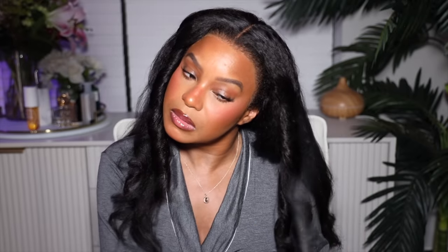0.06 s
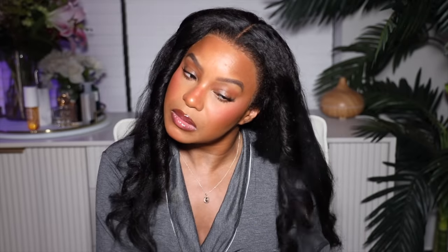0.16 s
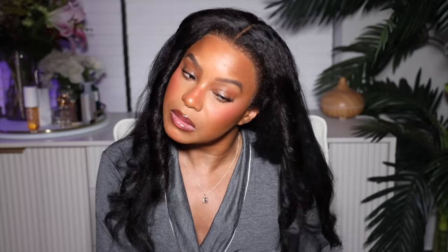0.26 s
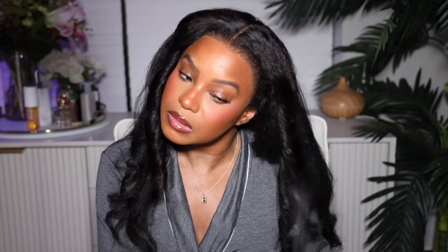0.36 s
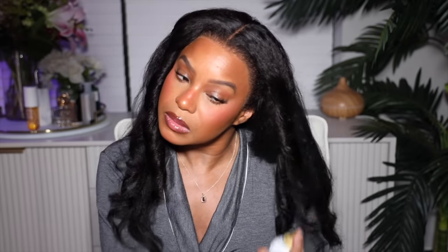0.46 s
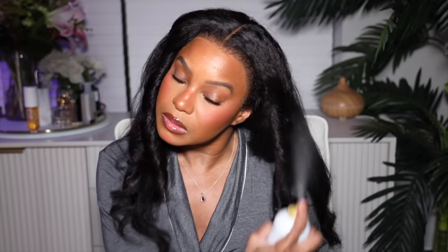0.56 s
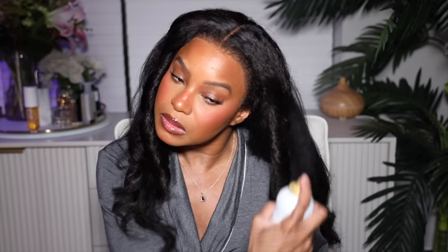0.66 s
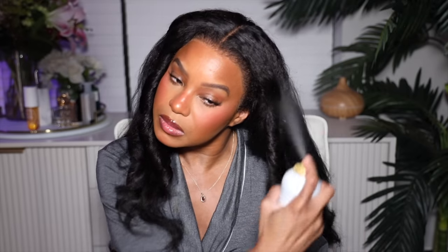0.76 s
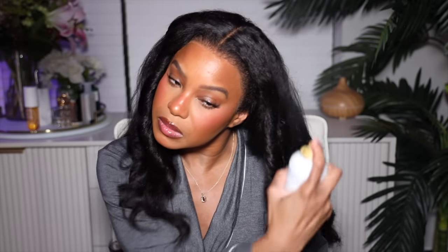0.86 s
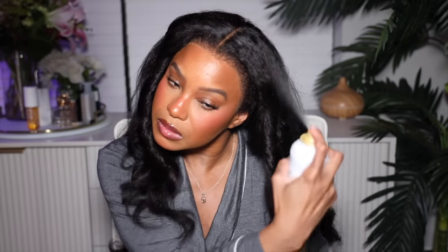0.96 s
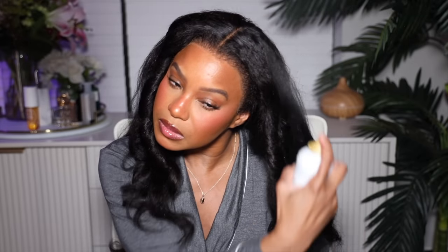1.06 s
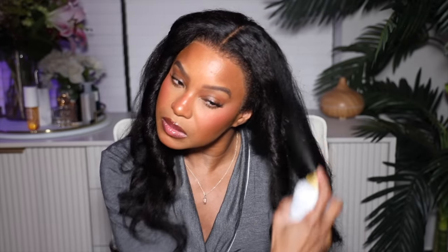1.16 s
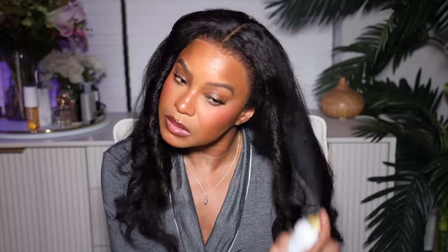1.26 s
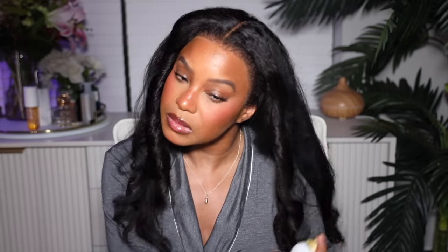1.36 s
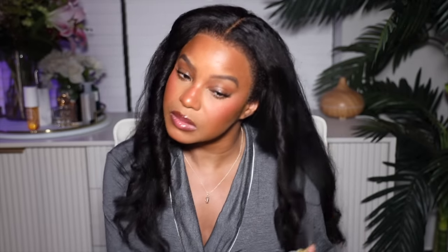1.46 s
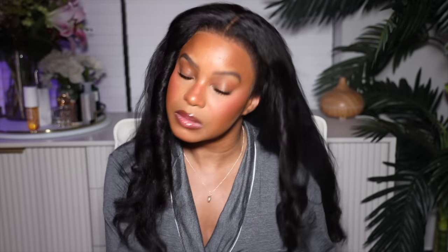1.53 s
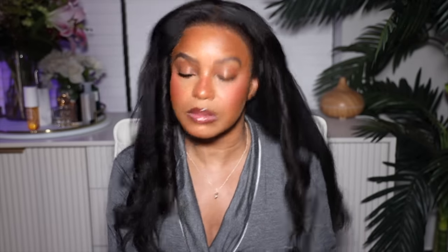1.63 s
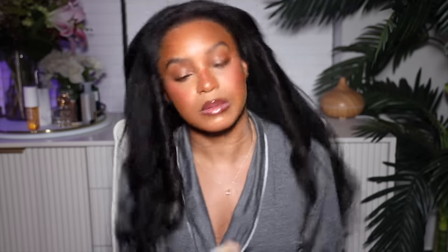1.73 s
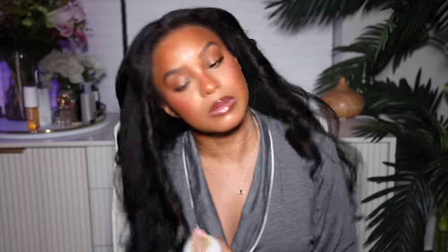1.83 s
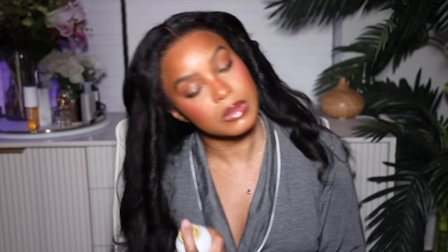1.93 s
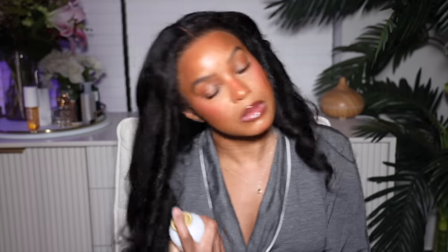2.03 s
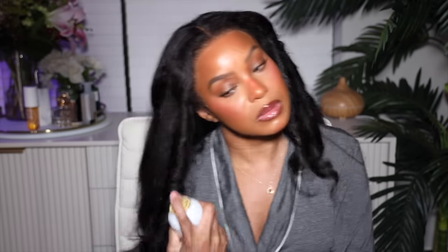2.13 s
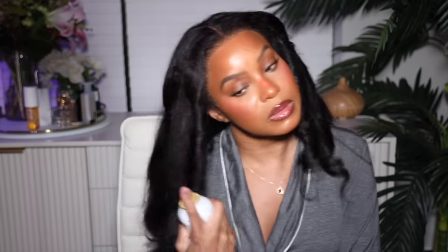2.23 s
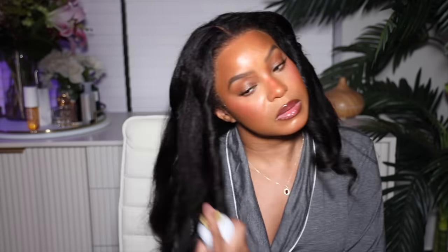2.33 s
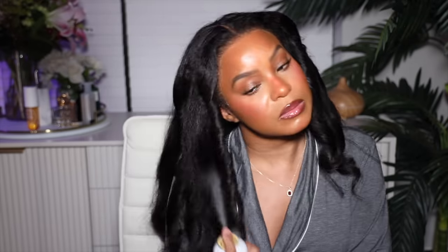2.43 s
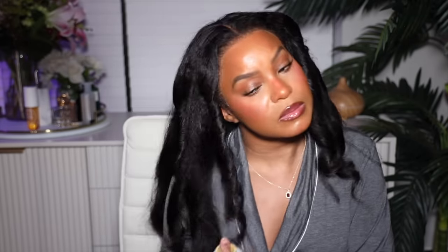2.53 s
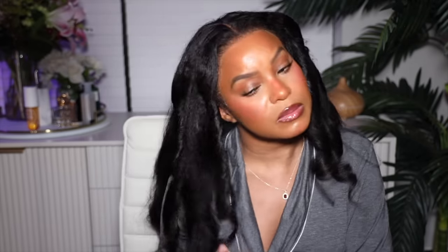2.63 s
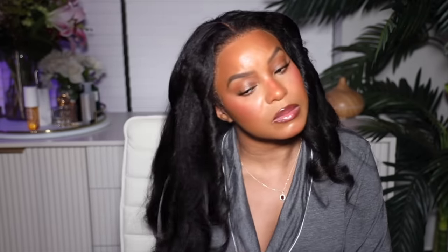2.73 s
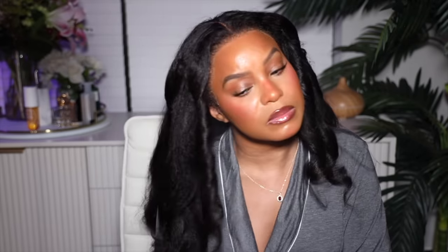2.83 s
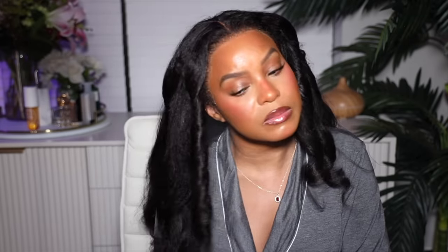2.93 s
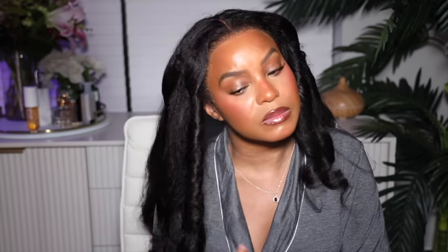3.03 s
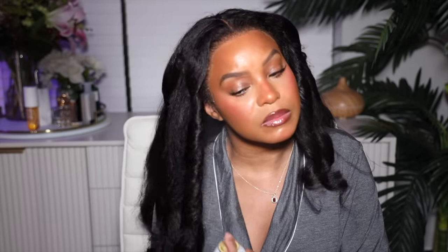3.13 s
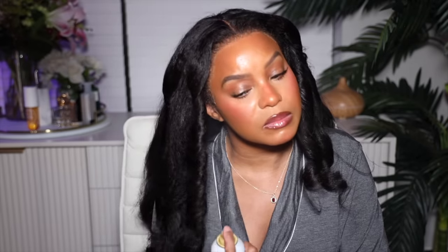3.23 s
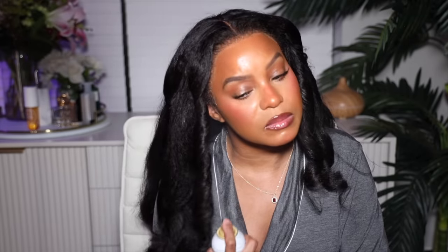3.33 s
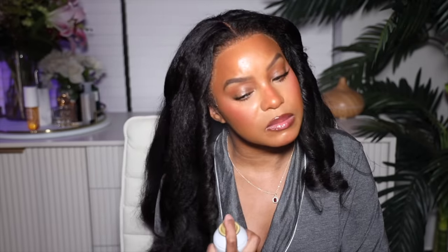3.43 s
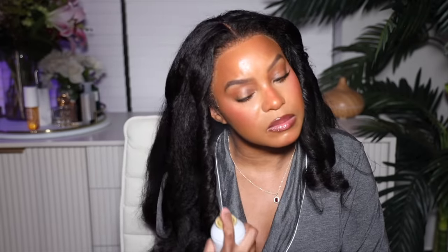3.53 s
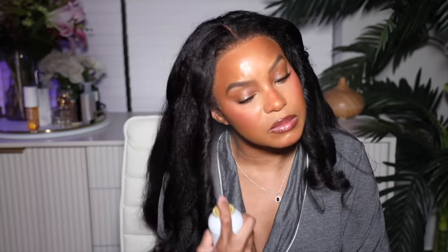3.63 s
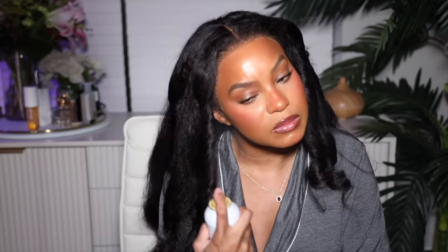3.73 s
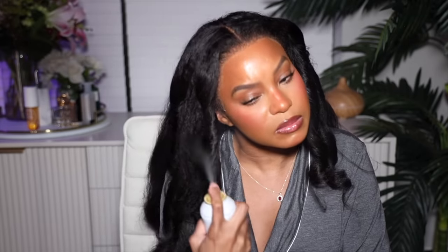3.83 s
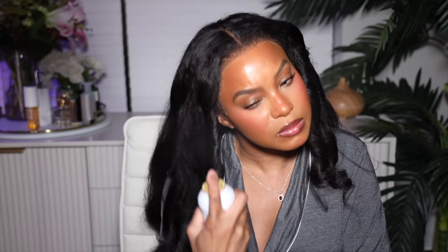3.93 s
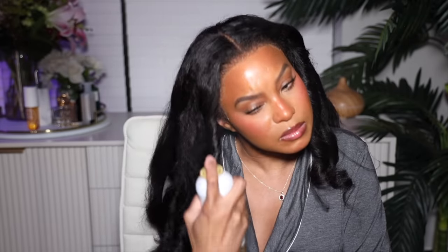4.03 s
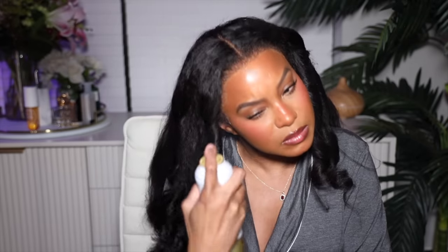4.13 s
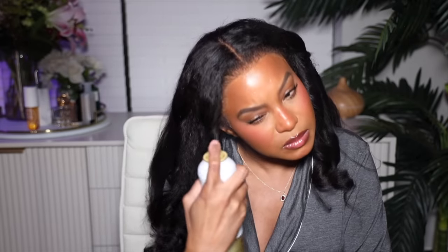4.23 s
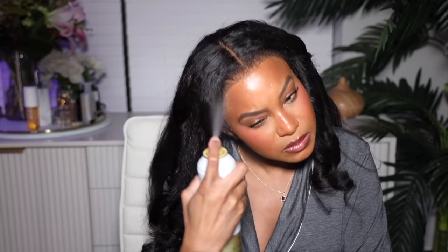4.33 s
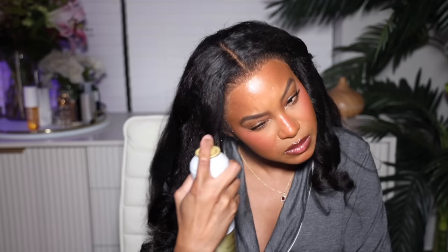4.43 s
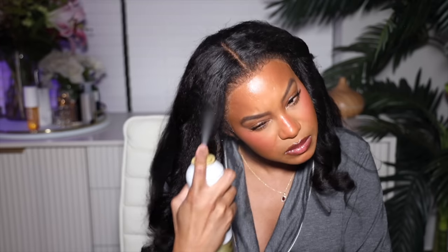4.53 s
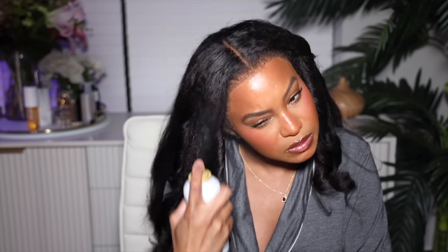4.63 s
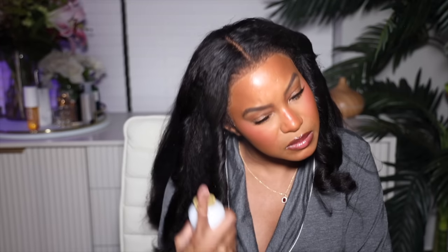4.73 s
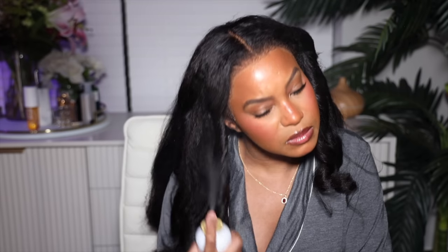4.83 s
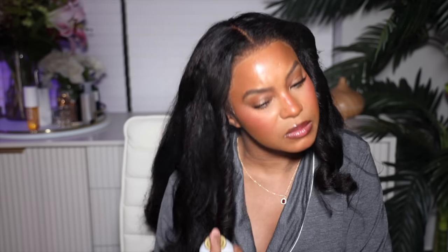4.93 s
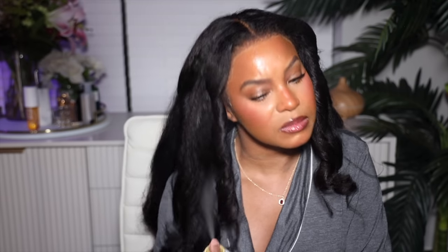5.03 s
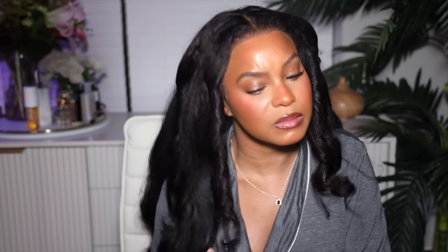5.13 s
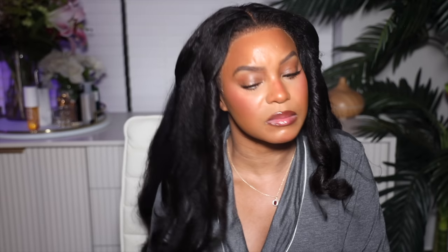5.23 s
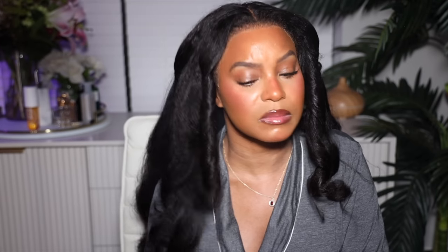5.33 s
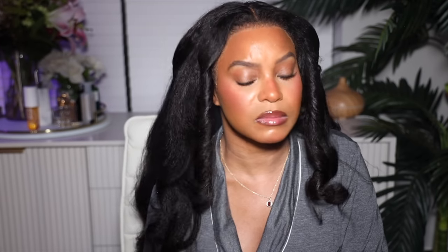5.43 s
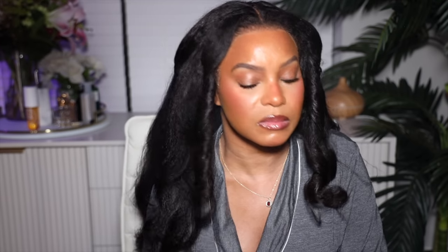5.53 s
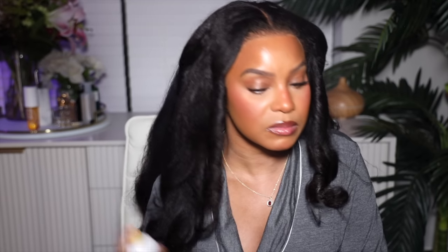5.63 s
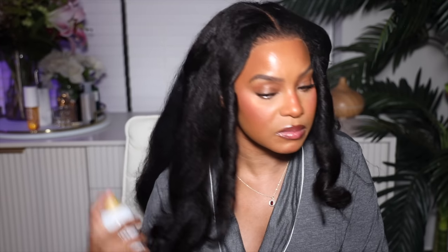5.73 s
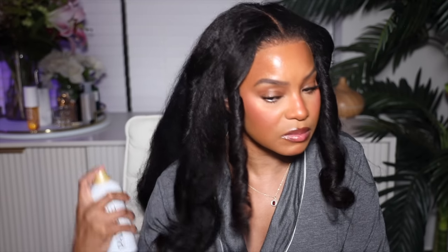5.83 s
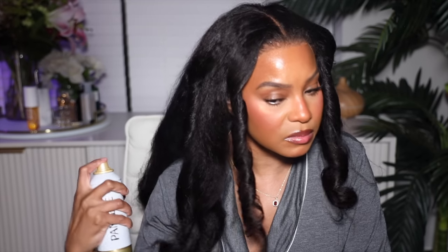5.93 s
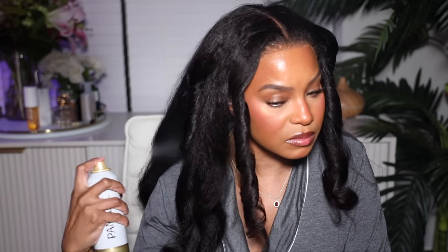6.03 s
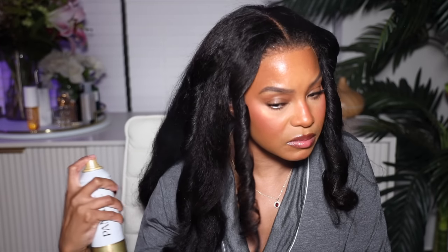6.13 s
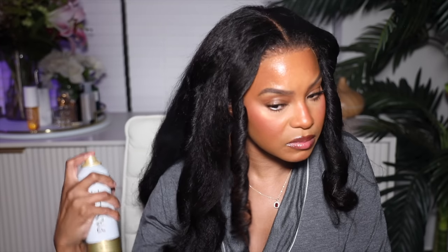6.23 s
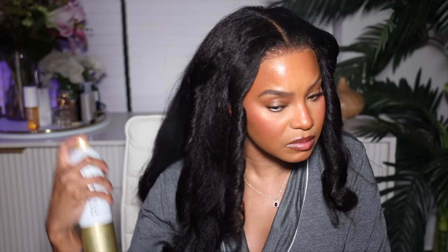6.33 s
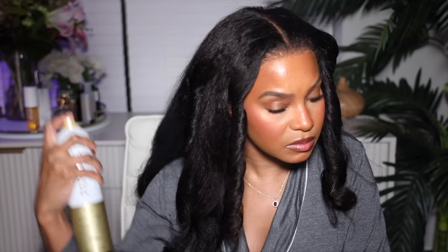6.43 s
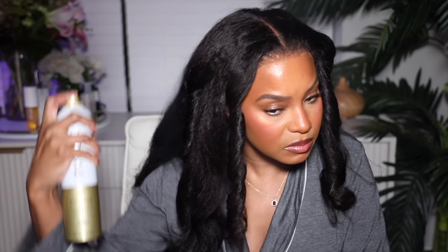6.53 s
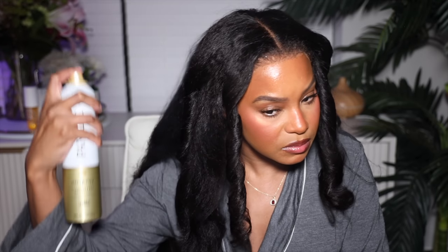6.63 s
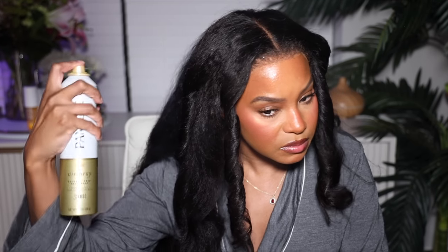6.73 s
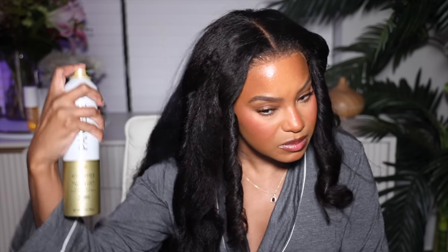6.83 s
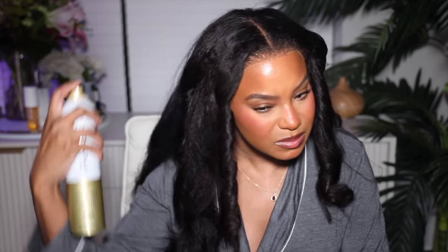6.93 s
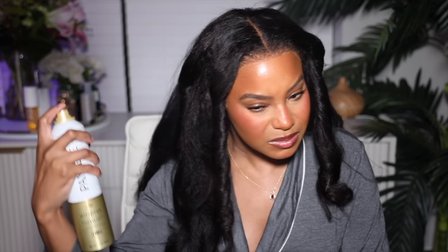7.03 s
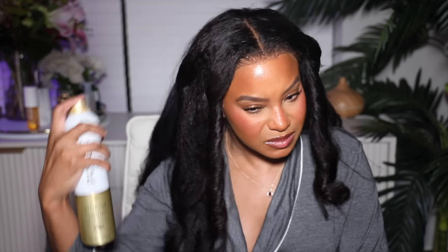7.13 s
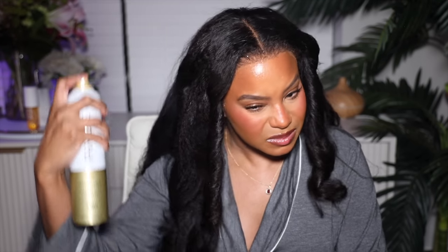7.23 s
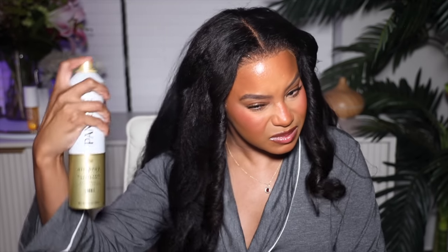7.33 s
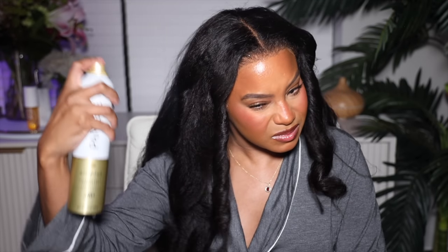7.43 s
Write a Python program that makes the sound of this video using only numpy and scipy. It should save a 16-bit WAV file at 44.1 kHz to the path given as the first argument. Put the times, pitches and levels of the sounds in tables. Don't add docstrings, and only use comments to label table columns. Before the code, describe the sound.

A spray can is pressed repeatedly near a head of hair in a furnished room. Each burst starts with a soft gas puff, swells to a bright roar with a faint whistling tone, then bleeds off with wet spitting. After the first run the body shifts, cloth rubs, and the can is knocked hard. More bursts follow in even rhythm, a brief shift, then stronger ones. Low airy room hum throughout, close and nearly mono.

```python
import sys
import numpy as np
from scipy import signal
from scipy.fft import rfft, irfft
from scipy.io import wavfile
from scipy.ndimage import uniform_filter1d, map_coordinates

SR = 44100
rng = np.random.default_rng(int(sys.argv[2]) if len(sys.argv) > 2 else 0)


def put_to_file(sound):
    columns = np.atleast_2d(sound).T
    safe = np.clip(columns, -1, 1)
    whole_steps = np.round(safe * 32767)
    wavfile.write(sys.argv[1], SR, whole_steps.astype(np.int16))


def ratio(d):
    e = np.asarray(d, float) / 20
    return 10 ** e


N = 329427
TIME = np.arange(N) / SR


def unit(x):
    return x / np.sqrt(np.mean(x ** 2))


def noise():
    return rng.standard_normal(N)


def band(x, lo_hz, hi_hz, order=2):
    sos = signal.butter(order, [lo_hz, min(hi_hz, .45 * SR)], "band", fs=SR, output="sos")
    return signal.sosfilt(sos, x)


def walk(rate_hz):
    hold = max(int(SR / rate_hz), 1)
    levels = rng.standard_normal(N // 4 + 1)[:N // hold + 1]
    return unit(uniform_filter1d(np.repeat(levels, hold), hold)[:N])


def mode(x, hz, t60):
    radius = np.exp(-np.log(1000) / (t60 * SR))
    turn = 2 * np.pi * hz / SR
    return signal.lfilter([0, np.sin(turn)], [1, -2 * radius * np.cos(turn), radius * radius], x)


def gate(start, stop, rise, fall):
    return np.clip((TIME - start) / rise, 0, 1) * np.exp(-np.clip(TIME - stop, 0, None) / fall)


def kicks(times_s, peaks_db):
    x = np.zeros(N)
    np.add.at(x, (np.array(times_s) * SR).astype(int), ratio(np.array(peaks_db)))
    return x


# at_s, level_db
ROOM_BASS = [(0.0, -43.5), (1.71, -42), (2.5, -40.5), (3.55, -40.5), (4.08, -45), (5.03, -42.5),
             (5.64, -46.5), (6.1, -37.5), (6.89, -41.5), (7.18, -39), (7.47, -43)]
# freq_hz, density_db_per_hz
ROOM_AIR = [(15, -45), (25, -26), (80, -7), (123, -10), (149, -10), (223, 1.5), (263, -5.5), (344, -6.5),
            (405, -13), (516, -8.5), (677, -13.5), (734, -12), (4030, -25.5), (12500, -36), (16000, -51)]
# freq_hz, level_db
MAINS = [(59.5, -68), (119, -58)]
HISS_DB, HISS_FADE_DB, HISS_FADE_S = -57.5, 15, 3.4


def room_tone():
    hz, db = np.transpose(ROOM_AIR)
    shape = ratio(np.interp(np.log(np.fft.rfftfreq(N, 1 / SR) + 1), np.log(hz), db))
    air = unit(irfft(rfft(noise()) * shape, N))
    bass = signal.sosfilt(signal.butter(1, 500, fs=SR, output="sos"), air)
    swell = ratio(np.interp(TIME, *np.transpose(ROOM_BASS)) + 1.0)
    hum = sum(ratio(db + 5.0) * np.sin(2 * np.pi * hz * TIME) for hz, db in MAINS)
    settle_db = HISS_FADE_DB * np.exp(-TIME / HISS_FADE_S)
    hiss = ratio(HISS_DB + settle_db) * band(noise(), 3000, 19000, order=1)
    return bass * swell + ratio(-43.5 + 0.37 * settle_db) * (air - bass) + hum + hiss


# at_s, effort_db
MOVEMENTS = [
    [(1.65, -23), (1.79, -19.5), (2.01, -10), (2.13, -4), (2.26, -1.5), (2.356, -12), (2.43, -5),
     (2.7, -10), (2.8, -14)],
    [(5.55, -13), (5.73, -10), (5.86, -2), (5.98, -3)],
    [(6.95, -1.5), (7.04, 0), (7.25, -2)],
]
# cloth_db, hair_db, chair_db
RUBS = [(-26, -32.5, -37.5), (-62, -66.5, -39.5), (-41.5, -38.5, -55)]
EFFORT_SLOPES = (1.0, 0.53, 0.46)


def rustle():
    grain_db = 1.9 * walk(300)
    cloth = unit(ratio(grain_db + 2.8 * walk(40)) * band(noise(), 250, 1400))
    hair = unit(ratio(grain_db + 1.5 * walk(730)) * band(noise(), 1160, 4500))
    chair = unit(band(noise(), 51, 220))
    out = np.zeros(N)
    for curve, dbs in zip(MOVEMENTS, RUBS):
        effort_db = np.interp(TIME, *np.transpose(curve), -400, -400)
        for db, slope, layer in zip(dbs, EFFORT_SLOPES, (cloth, hair, chair)):
            out += ratio(db - 4 + slope * effort_db) * layer
    return out


# start_s, peak_db, pitch_hz, t60_s
TAPS = [(1.704, -35, 2300, .02), (1.9506, -5.5, 865, 0.0046), (1.9547, -11.5, 503, 0.035),
        (1.977, -20, 440, .025), (2.06, -22, 930, 0.013), (2.168, -17.5, 940, 0.019),
        (2.2197, -17, 600, 0.0091), (2.3924, -9, 570, 0.012), (2.392, -16, 1200, 0.01),
        (5.68, -35, 2400, .014), (5.774, -29.5, 2350, 0.011), (5.774, -34, 3270, .007),
        (2.468, -3, 2290, 0.025), (1.99, -24, 570, 0.039), (2.02, -26, 526, 0.03), (2.32, -20, 1200, .02),
        (6.986, -23.5, 2520, 0.022)]
# start_s, peak_db, crack_hz
KNOCKS = [
    (2.2924, -2, 6000),
    (2.295, 5, 2120),
    (2.2987, -2.5, 4550),
    (2.2996, 0, 5700),
]
# pitch_hz, t60_s, level_db
CAN = [(1600, .01, -8), (2200, .008, -9), (3850, .016, 1), (5500, .007, -3), (6700, .008, -9),
       (8500, .02, -13)]


def handling():
    taps = np.zeros(N)
    for t, db, hz, t60 in TAPS:
        taps += mode(band(kicks([t], [db]), 0.41 * hz, 3 * hz, order=1), hz, t60)
    cracks = sum(mode(kicks([t], [db]), hz, t60=0.0029) for t, db, hz in KNOCKS)
    start = KNOCKS[0][0]
    rattle = gate(start, start + 0.0033, rise=0.0007, fall=0.051) * noise()
    rings = np.zeros(N)
    for hz, t60, db in CAN:
        rings += ratio(db - 38.5) / np.sqrt(t60 / 0.016) * mode(rattle, hz, t60)
    thud = gate(start, start + 0.049, rise=0.013, fall=0.037) * unit(band(noise(), 93, 390))
    contact = ratio(-20) * band(rattle, 300, 8500, order=1)
    return ratio(1.5) * taps + cracks + contact + rings + ratio(-25) * thud


def trickle():
    hiss = unit(mode(ratio(2.7 * walk(40)) * noise(), hz=2720, t60=.012))
    return ratio(-47.5) * gate(6.93, 7.24, rise=.03, fall=.02) * hiss


# start_s, peak_db, centre_hz, length_ms
POPS = [(0.5257, -13, 12000, 2.5), (0.7465, -7, 8120, 3.1), (0.9767, -6.5, 13000, 2.5),
        (1.197, -7, 10800, 3.8), (2.4291, 4.5, 10800, 1.4), (2.4669, 3.5, 12000, 7),
        (2.806, -9, 11700, 6.6), (2.83, 6, 7850, 4.7), (6.0067, 2.5, 7120, 4.4), (6.815, 6.5, 7000, 1.9),
        (7.1266, -10.5, 10000, 4.4)]
# start_s, peak_db
DRIPS = [(1.625, -17), (1.735, -25), (1.7444, -24), (2.0025, -25), (2.1684, -25), (3.035, -11),
         (3.0844, -23), (3.283, -26), (3.5044, -8), (3.7367, -9), (3.7593, -28), (3.7753, -24),
         (3.785, -16), (4.0144, -26), (4.0633, -16), (4.264, -21), (4.285, -14.5), (4.299, -21),
         (4.507, -16), (4.9776, -12), (5.2244, -27), (5.2544, -27), (5.285, -23), (5.44, -26), (5.481, -25),
         (5.5114, -26), (5.6044, -31.5), (5.6544, -34), (5.74, -25), (5.536, -18)]
DRIP_HZ, DRIP_SPREAD, DRIP_MS = 8500, 0.24, 2.1


def spits():
    out = np.zeros(N + 2000)
    age_s = np.arange(2000) / SR
    noises = rng.standard_normal((len(POPS) + len(DRIPS), 2000))
    drips = [(t, db, DRIP_HZ * np.exp(DRIP_SPREAD * n[0]), DRIP_MS) for (t, db), n in zip(DRIPS, noises)]
    for (t, db, hz, ms), burst in zip(list(POPS) + drips, noises):
        puff = unit(band(burst, 0.24 * hz, 1.32 * hz)) * np.exp(-age_s / (ms / 1000))
        start = int(t * SR)
        out[start:start + 2000] += ratio(db - 11.5) * puff
    return out[:N]


# at_s, path_cm, share
SHOULDER = [(.05, 24.8, .36), (.33, 23.8, .26), (.52, 31, .2), (.96, 48.5, .14), (1.35, 33, .2),
            (1.56, 24, .2), (2.43, 28.5, .18), (2.8, 23.6, .36), (3.03, 19.8, .34), (3.6, 28.5, .22),
            (4.1, 48, .16), (4.45, 52, .1), (4.75, 44.5, .18), (5.05, 27.8, .42), (5.45, 19, .42),
            (5.98, 29.7, .26), (6.24, 28.3, .2), (6.6, 41, .07)]
# at_s, path_cm, share
FACE = [(.05, 10, .15), (.45, 10.8, .17), (.53, 12, .26), (.72, 14, .2), (.97, 14.2, .2), (1.17, 10.5, .2),
        (1.41, 9, .24), (1.6, 11.5, .24), (2.43, 9, .13), (3.1, 9, .16), (3.6, 10.5, .2), (3.85, 13, .25),
        (4.05, 16.5, .2), (4.3, 11.8, .13), (4.8, 9.7, .16), (5.2, 9.7, .22), (6, 9.4, .14), (7.3, 11, .1)]


def echoes(jet):
    bright = band(jet, 1500, 19000, order=1)
    for at_s, path_cm, share in (np.transpose(FACE), np.transpose(SHOULDER)):
        source = np.arange(N) - SR * np.interp(TIME, at_s, path_cm) / 34300
        jet = jet + np.interp(TIME, at_s, share) * map_coordinates(bright, [source])
    return jet


# start_s, liquid_after_s, shut_after_s, flow_db, head_tone_hz
PRESSES = [(0.046, 0.019, 0.13, -22.5, 2370), (0.31, 0.027, 0.1, -22, 2290),
           (0.522, 0.015, 0.12, -19, 1790), (0.748, 0.015, 0.12, -19.5, 2340),
           (0.975, 0.016, 0.12, -20.5, 2420), (1.195, 0.018, 0.12, -20, 2220),
           (1.409, 0.02, 0.11, -19.5, 2380), (2.427, 0.073, 0.17, -24, 2500),
           (2.802, 0.023, 0.14, -17.5, 1800), (3.106, 0.028, 0.078, -16.5, 1510),
           (3.344, 0.016, 0.086, -16.5, 2300), (3.597, 0.02, 0.084, -18.5, 2310),
           (3.847, 0.029, 0.09, -18.5, 2240), (4.311, 0.031, 0.079, -15.5, 2210),
           (4.548, 0.016, 0.095, -17, 2120), (4.794, 0.034, 0.095, -18, 1590),
           (5.031, 0.016, 0.13, -21, 2450), (5.293, 0.046, 0.094, -20.5, 1960),
           (5.98, 0.023, 0.139, -18, 2270), (6.26, 0.028, 0.087, -15.5, 2330),
           (6.531, 0.019, 0.1, -15, 2320), (6.767, 0.018, 0.1, -15.5, 2240),
           (7.249, 0.023, 0.13, -16, 2280)]
# start_s, length_s, level_db
LEAKS = [
    (4.115, 0.023, -28),
    (4.143, 0.017, -24),
    (4.157, 0.0074, -36),
    (4.169, 0.008, -23),
]
# pitch_hz, t60_s, level_db
CHAMBER = [(4000, 0.0039, 0.5), (4680, 0.0089, -45)]
# at_s, treble_facing_mic_db, low_splash_on_hair_db, gas_from_tilt_db, tone_freed_by_finger_db
AIM = [(.1, 4.5, -7.5, 1, 0), (.36, 5, 0, 1.5, -1), (.58, 0.5, -3.5, 0, 1), (.8, 1.5, -10, 1.5, 2.5),
       (1.03, 2.5, -8, 0.5, 2), (1.35, -0.5, -5, -1.5, -1.5), (2.5, 9, -7.5, 6.5, 2.5),
       (2.87, 1.5, -14, 5, -1), (3.15, -0.5, -10.5, 3.5, -3), (3.65, 3.5, -4, 1, -1.5),
       (4.45, 1.5, -1.5, 0, 1.5), (4.85, 1, -4.5, 0, -3.5), (5.1, 6.5, -6, 1.5, -2.5), (5.35, 5, -5, 0, -2),
       (6.05, 2, -2.5, 0.5, -0.5), (6.3, -0.5, -5, -0.5, -3), (6.8, -7, -2.5, 4, 1.5),
       (7.3, -1.5, -1.5, 2, 1)]
SAG_DB, BLEED_S, GAS_DB, BLEED_DB, GAS_BEAM = -1.73, 0.034, -2.5, -8.5, 0.69
HEAD_HZ, SINGS_DB, DETUNE_DB_PER_OCTAVE = 2350, -6, 6.5


def spray():
    treble, middle, low, ring, tone = np.zeros((5, N))
    droplets_db = 1.57 * walk(2500) + 1.0 * walk(250)
    noises = rng.standard_normal((4, N))
    drive = ratio(droplets_db) * noises[3]
    aim_s, *aim = np.transpose(AIM)
    for t, wet, end, flow_db, hz in PRESSES:
        face_db, splash_db, tilt_db, free_db = (np.interp(t + end / 2, aim_s, db) for db in aim)
        ring_db = SINGS_DB + free_db - DETUNE_DB_PER_OCTAVE * abs(np.log2(hz / HEAD_HZ))
        dry_gain = ratio(flow_db + GAS_BEAM * face_db)
        seal = 0.53 * gate(t, t + wet, rise=0.0011, fall=0.00074)
        build = 0.44 * gate(t, t + wet, rise=0.016, fall=0.00076)
        gas = dry_gain * ratio(GAS_DB + tilt_db) * (seal + build)
        held = (TIME - t - wet) / (end - wet)
        sag = ratio(np.clip(2 * SAG_DB * (held - .5), -8, 8))
        liquid = sag * gate(t + wet - .002, t + end, rise=0.0083, fall=0.0019)
        shut, bled = t + end, t + end + BLEED_S
        bleed = gate(shut, bled, rise=0.0028, fall=0.014)
        bleed += ratio(-9.0 + 1.05 * tilt_db) * gate(shut, bled, rise=0.012, fall=0.026 + 0.31 * end)
        treble += gas + ratio(flow_db + face_db) * liquid + dry_gain * ratio(BLEED_DB) * bleed
        middle += ratio(-8.0) * gas + ratio(flow_db) * (liquid + ratio(-14) * bleed)
        splash = liquid * gate(t + wet, t + end, rise=0.068, fall=0.013)
        low += ratio(-44) * gas + ratio(flow_db + splash_db) * (splash + ratio(-17.5) * bleed)
        ring += ratio(flow_db + ring_db + 0.44 * face_db) * (liquid + ratio(-17) * bleed)
        ring += ratio(ring_db - 9) * gas
        now = slice(int(t * SR), int((t + 0.22) * SR))
        sharp = unit(mode(drive[now], hz, t60=.011))
        blurred = unit(mode(noises[1, now], .9 * hz, t60=.002))
        tone[now] = sharp + .35 * blurred
    for t, length, db in LEAKS:
        puff = ratio(db) * gate(t, t + length, rise=0.0032, fall=.0015)
        treble += puff
        middle += ratio(-4.0) * puff
    jet = treble * unit(ratio(droplets_db + 0.13 * walk(60)) * band(noises[0], 6800, 14900, order=1))
    jet += middle * unit(ratio(0.73 * droplets_db + 1.45 * walk(70)) * band(noises[1], 970, 6600))
    jet += low * unit(band(ratio(1.3 * droplets_db + 1.8 * walk(50)) * noises[2], 270, 2000))
    head = tone + sum(ratio(db) * unit(mode(drive, hz, t60)) for hz, t60, db in CHAMBER)
    jet -= 0.29 * band(jet, 2720, 3070, order=1)
    return ratio(-1.4) * echoes(jet) + ring * head


# centre_hz, t60_s, level_db
ROOM_T60 = [(294, 0.51, -12), (1200, 0.4, -7), (3230, 0.68, -8), (6000, 0.38, -12), (12000, 0.083, -32)]


def reverb(x):
    age_s = np.arange(SR // 2) / SR
    onset = np.clip(age_s / 0.0021 - .5, 0, 1)
    tail = 0
    for (hz, t60, db), burst in zip(ROOM_T60, rng.standard_normal((len(ROOM_T60), 2, len(age_s)))):
        part = band(burst, hz / 2, hz * 1.8) * np.exp(-np.log(1000) * age_s / t60) * onset
        tail = tail + ratio(db) * part / np.sqrt(np.sum(part ** 2) / 2) * np.sqrt(hz / 22000)
    place = np.array([walk(5) for _ in range(2)])
    place /= np.sqrt(np.sum(place ** 2, axis=0))
    return signal.fftconvolve(x * place, tail, axes=1)[:, :N].sum(axis=0)


def scene():
    near = band(spray() + spits(), 112, 20000) + handling() + rustle() + trickle()
    mid = near + reverb(near) + room_tone()
    side = ratio(-33.5) * band(np.roll(mid, 900), 200, 670, order=3)
    return np.array([mid + side, mid - side])


def band_limit(x):
    return signal.sosfilt(signal.butter(12, 16960, fs=SR, output="sos"), x)


# centre_s, low_hz, high_hz, level_db
SWIRLS = [
    (.575, 5200, 7500, -30),
    (2.575, 13100, 16000, -29),
    (2.575, 4120, 5670, -32),
    (4.41, 13800, 16000, -33),
    (4.41, 10400, 11900, -32),
    (6.665, 10400, 12300, -35),
]


def record(dry):
    side = np.zeros(N)
    for (t, lo_hz, hi_hz, db), burst in zip(SWIRLS, rng.standard_normal((len(SWIRLS), 2048))):
        start = int(t * SR) - 1024
        swirl = np.hanning(2048) * unit(band(burst, lo_hz, hi_hz, order=6))
        side[start:start + 2048] += ratio(db + 2.5) * swirl
    low_pass = signal.ellip(10, .2, 70, 15800, fs=SR, output="sos")
    cut = signal.sosfilt(low_pass, dry + np.array([side, -side]))
    return band_limit(np.clip(cut, -1, 1))


dry = scene()
out = record(dry)
put_to_file(out)
```